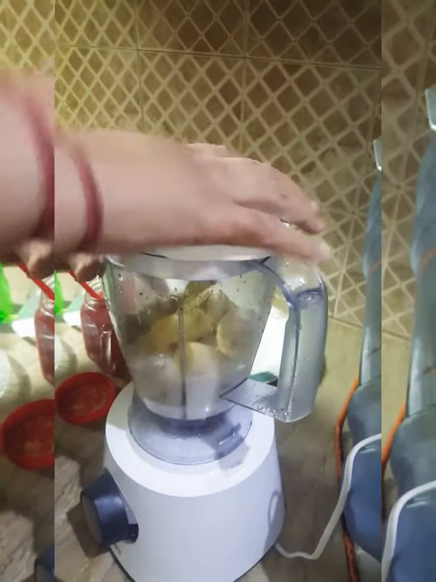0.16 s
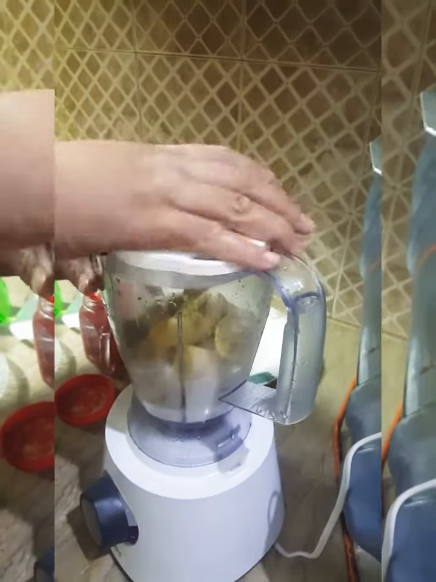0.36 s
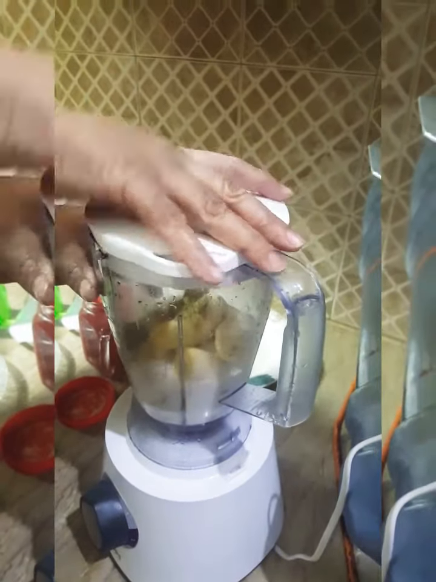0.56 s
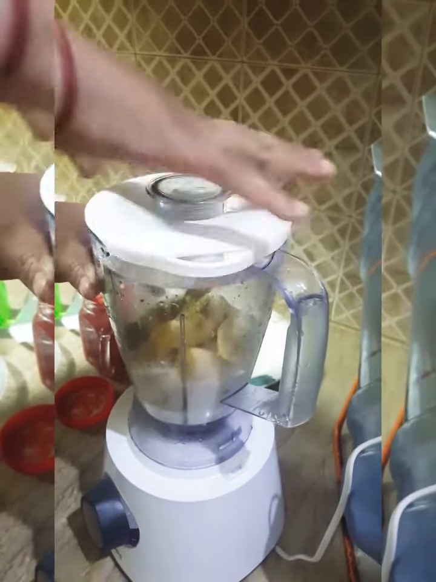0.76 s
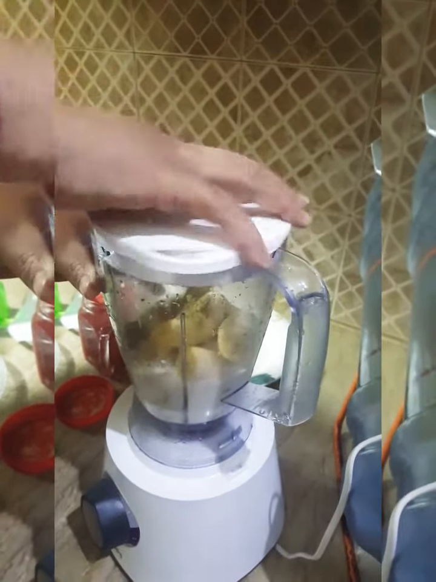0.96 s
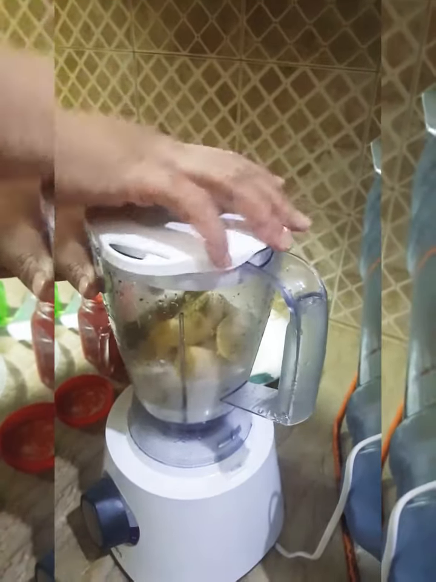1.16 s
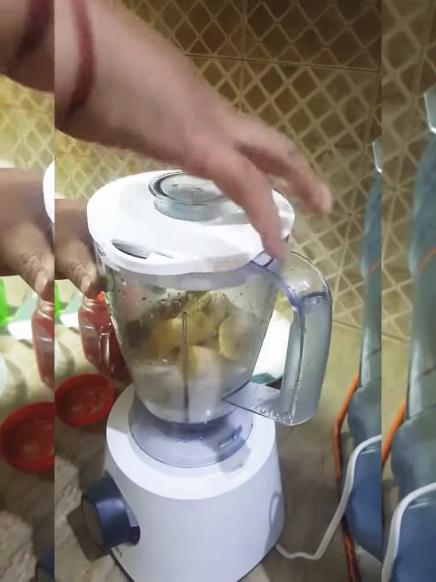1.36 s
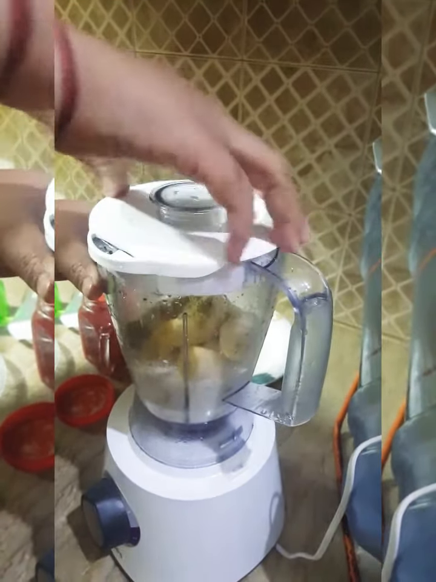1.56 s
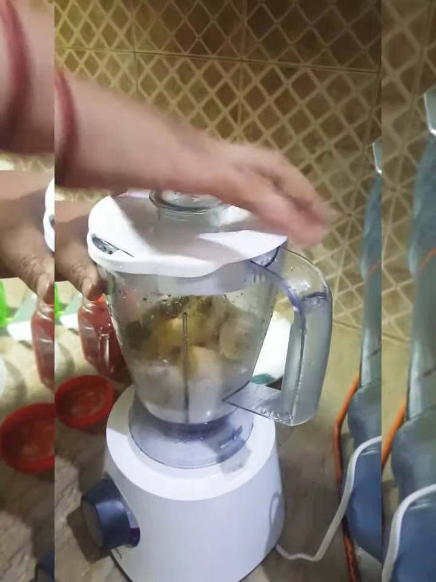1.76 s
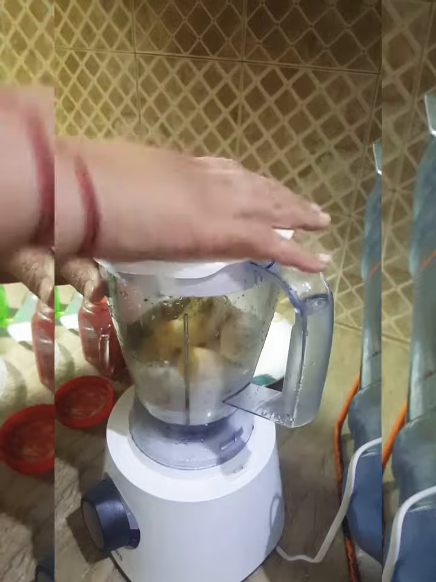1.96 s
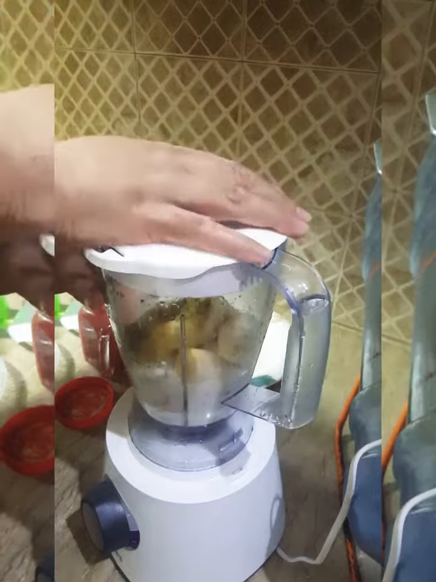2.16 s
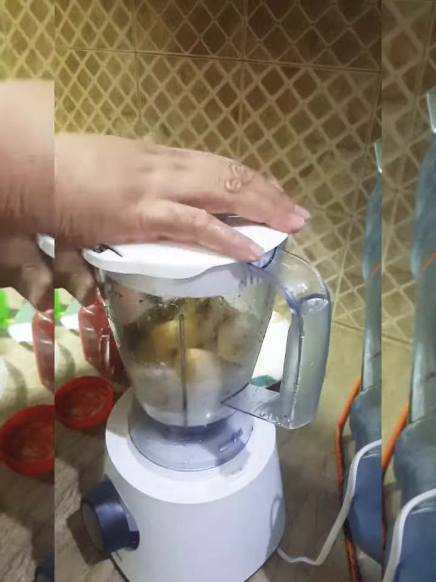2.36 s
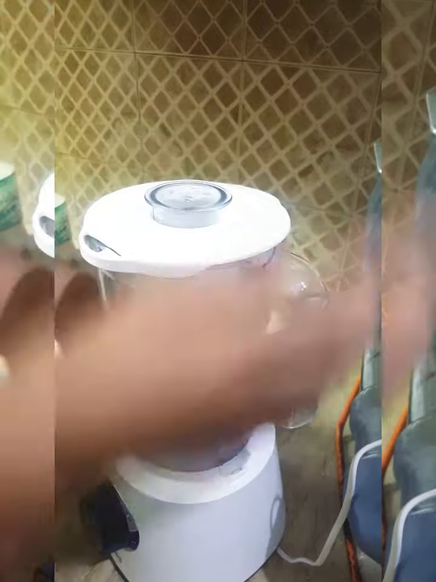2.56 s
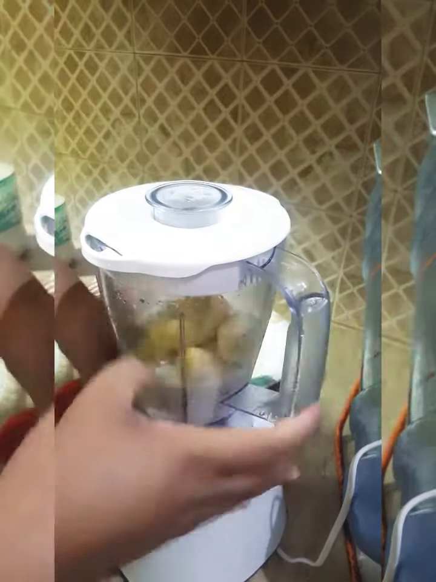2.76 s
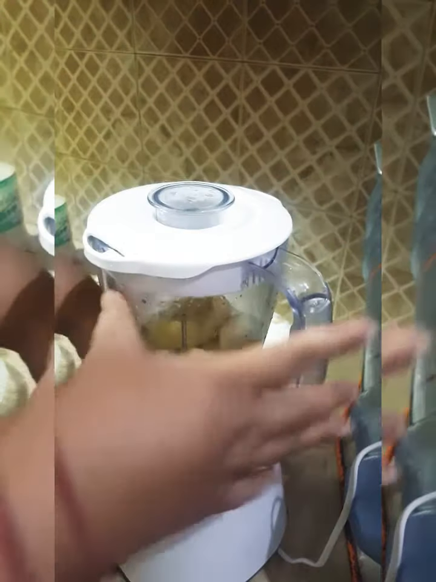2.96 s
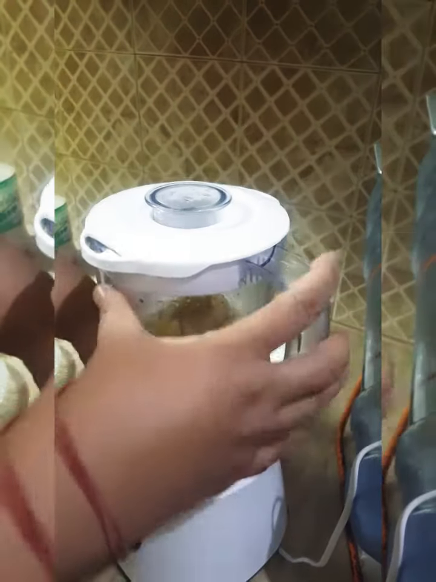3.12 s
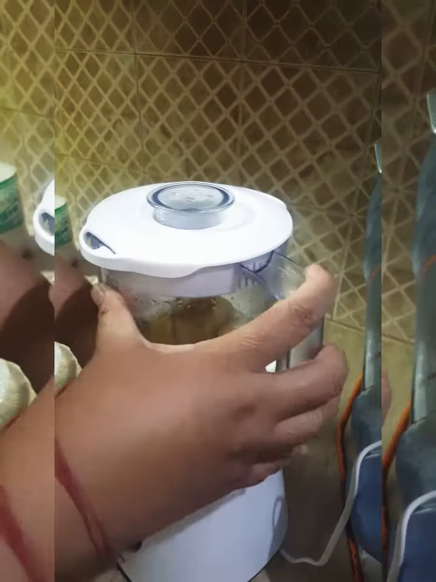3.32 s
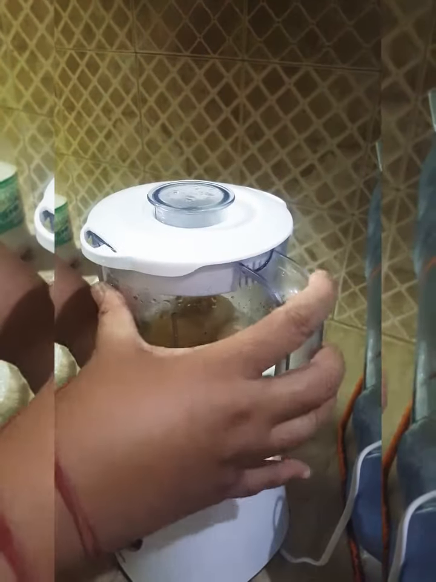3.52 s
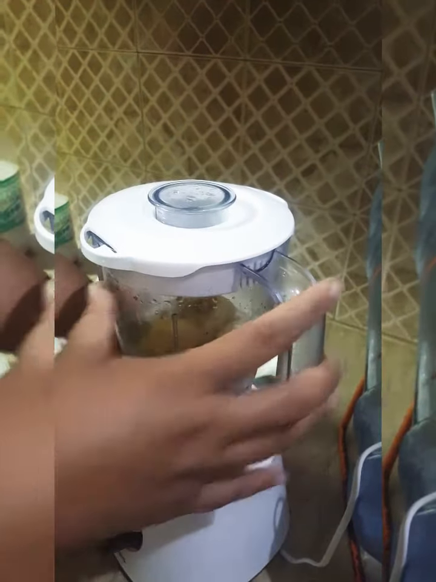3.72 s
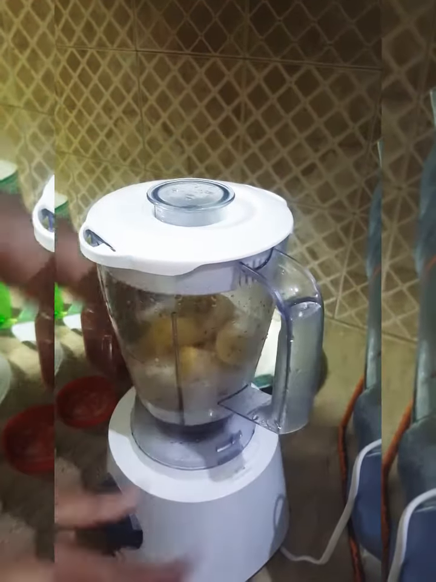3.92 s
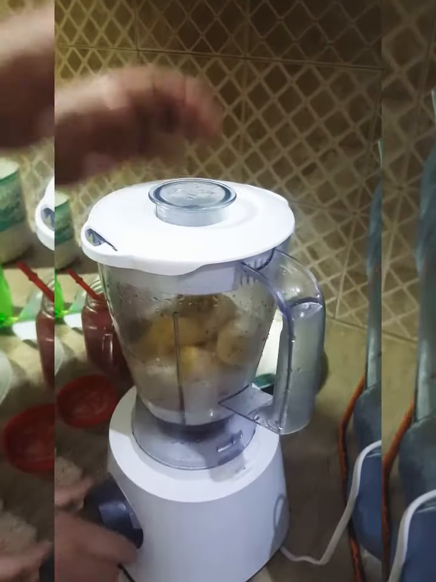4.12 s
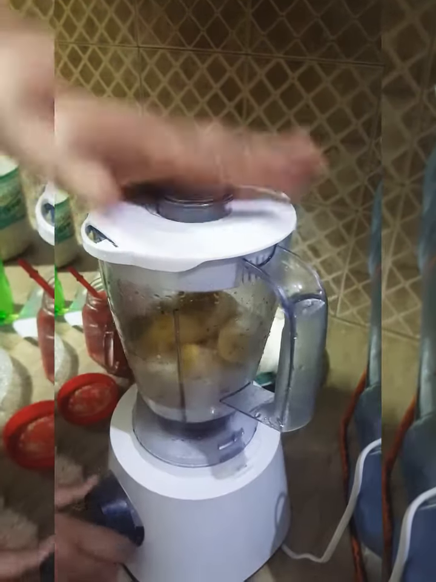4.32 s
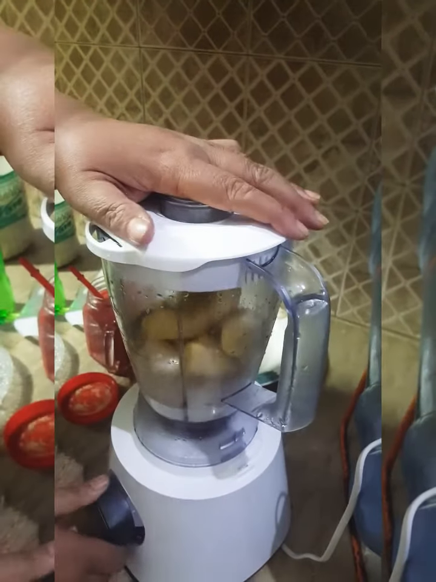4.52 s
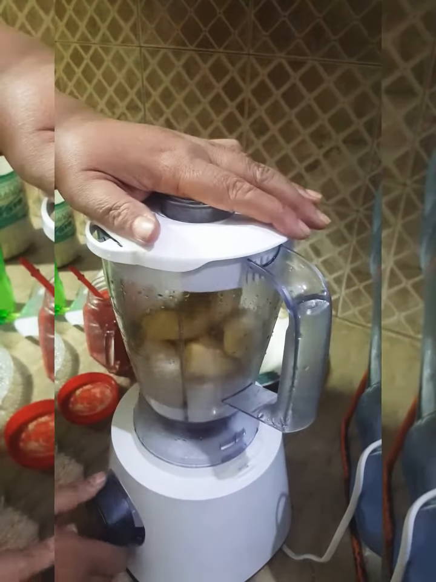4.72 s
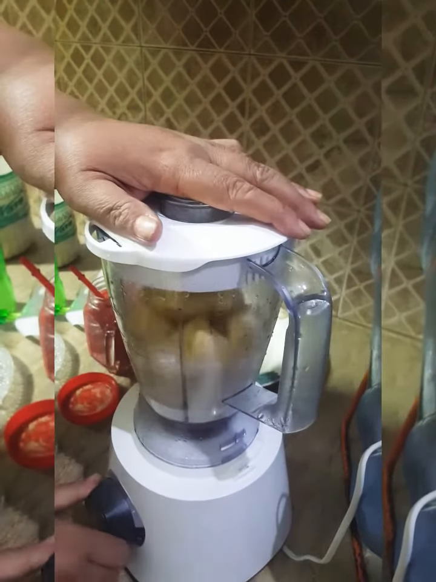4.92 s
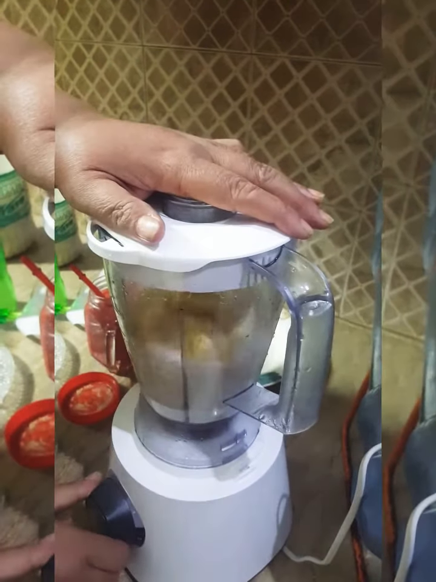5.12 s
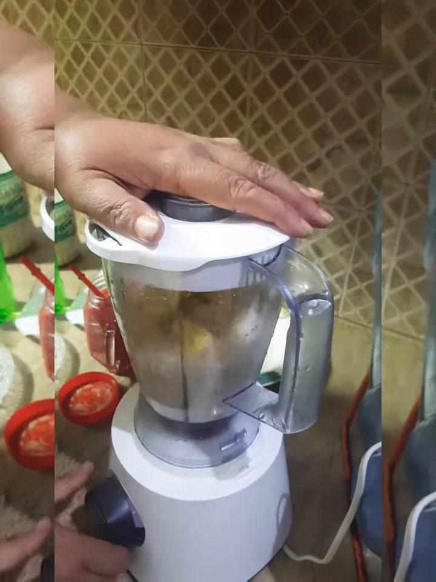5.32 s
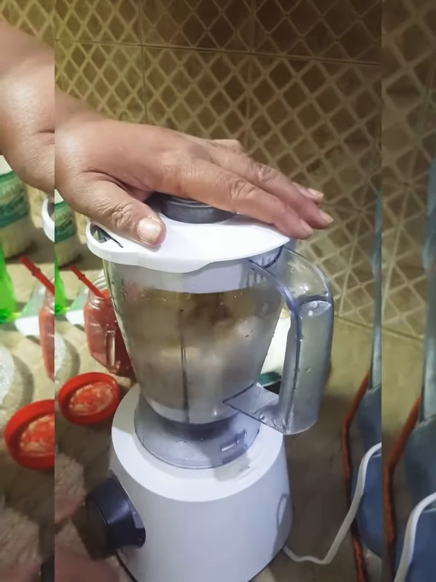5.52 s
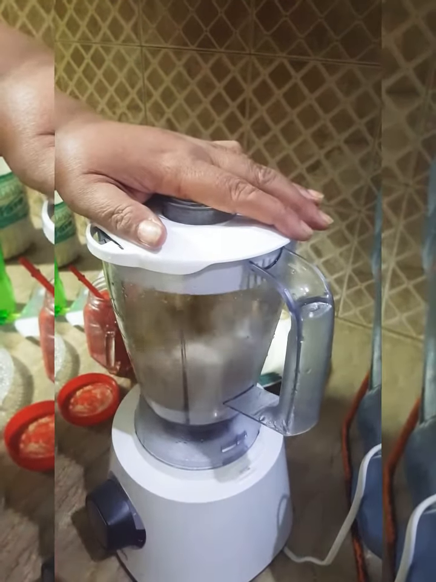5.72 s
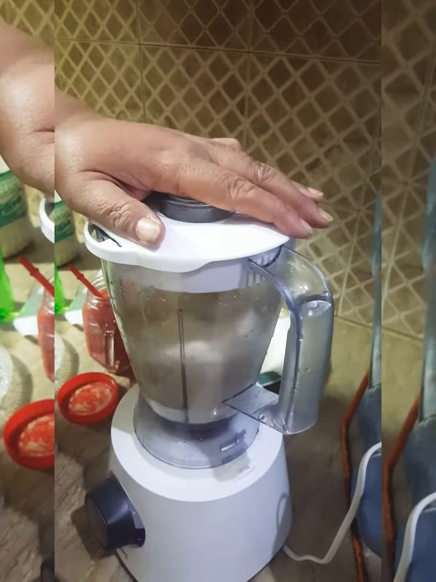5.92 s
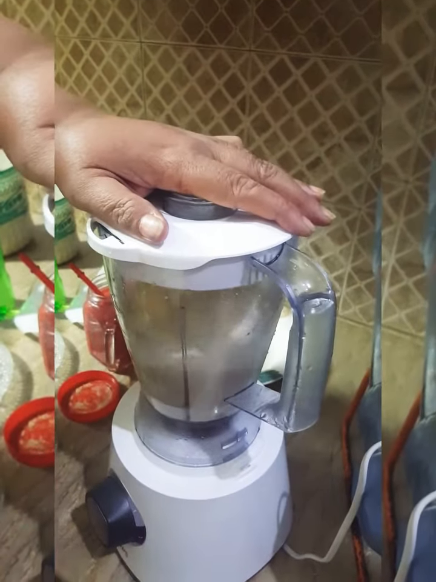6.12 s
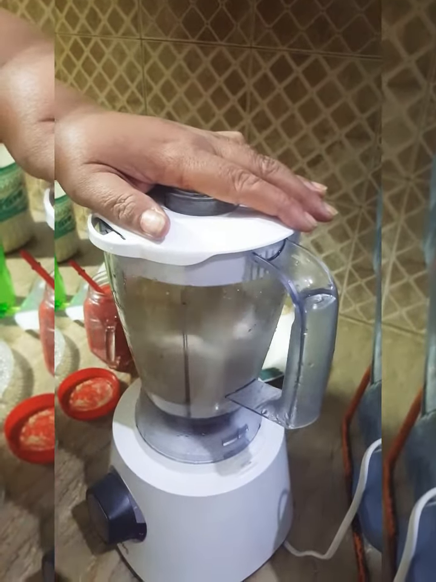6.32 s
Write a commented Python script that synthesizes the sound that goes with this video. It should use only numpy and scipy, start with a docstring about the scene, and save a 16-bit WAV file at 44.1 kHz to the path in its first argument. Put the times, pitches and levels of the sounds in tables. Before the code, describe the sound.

Light plastic lid taps over faint room hum, one hard jar knock, two short motor bursts, then a loud whining blender churning chunks to the end.

```python
"""Over the faint, wavering hum of a small tiled kitchen, a palm presses a plastic lid onto a blender:
each snap makes decaying tones of the lid, a tick and a dull thud, with soft rubbing between.
A hand brushes the jar, which then seats with a knock and one bounce, in noise bursts and ringing tones.
The knob jogs the motor twice and holds it on, still running at the end: random blade impacts batter
chunks against the jar, while the shaft hums and the commutator whines at the same changing speed."""
import sys
import numpy as np
from scipy import signal
from scipy.fft import rfft, irfft
from scipy.io import wavfile
from scipy.ndimage import uniform_filter1d

SR = 44100
rng = np.random.default_rng(int(sys.argv[2]) if len(sys.argv) > 2 else 0)


def master(y):
    """Save y as 16-bit WAV."""
    cut = np.clip(np.atleast_2d(y).T, -1, 1)
    pcm = np.round(cut * 32767)  # scale
    wavfile.write(sys.argv[1], SR, pcm.astype(np.int16))


N = 281358  # length in samples

# Turns of the speed knob: on_s, off_s, level_db (the last one is still on at the end)
KNOB_TURNS = [(4.476, 4.508, 4), (4.784, 4.935, 4), (5.064, 6.4, 0.5)]
# Blender at full speed: time_s, whine_pitch_hz, chopping_db (before CHOP_GAIN_DB)
FULL_SPEED_RUN = [(5.34, 6433, -23), (5.41, 6852, -18), (5.51, 6914, -20), (5.64, 6900, -20.5),
                  (5.87, 6877, -20.5), (5.94, 7080, -22), (6.04, 7470, -20), (6.14, 7320, -21.5),
                  (6.22, 7058, -20), (6.29, 6750, -19.5), (6.38, 6600, -21.5)]
# Chunks crowd into the blades and the noise swells: middle_s, extra_thump_db, extra_chop_db, length_s
JAMS_OF_CHUNKS = [(4.88, 1, 2.5, 0.049), (4.955, 6, -1.5, 0.063), (5.142, 5.5, 2, .05),
                  (5.255, 10, 1.5, 0.045), (5.636, 5, 1.5, .03), (6.355, 8, 1, 0.038)]
# Spectrum of the low thumping: pitch_hz, level_db
THUMP_SPECTRUM = [(70, -21), (110, -5.5), (180, -3), (250, 3.5), (310, -0.5), (350, -7), (405, 2),
                  (470, -12), (700, -64)]
# Spectrum of the chopping: pitch_hz, level_db
CHOP_SPECTRUM = [(330, -34.5), (490, -6.5), (600, -0.5), (1300, 0), (2050, -5), (2500, -10), (3300, -25),
                 (9000, -82)]
# Spectrum of the hissing air and spray: pitch_hz, level_db
HISS_SPECTRUM = [(1800, -10.5), (3000, 2), (4500, -2.5), (6200, -9.5), (7600, -10.5), (9800, -28),
                 (11500, -22), (13800, -19.5), (15500, -33)]
# Resonances of jar and motor housing under the blades: pitch_hz, level_db
CHURN_RESONANCES = [(570, 5.5), (698, 8), (810, -7), (858, 7.5), (1080, 1.5), (1218, 2.5), (1432, 5),
                    (1591, 7), (1702, 2), (1892, 3), (1985, 8), (2075, 1.5), (2165, 0)]
# Harmonics of the shaft hum: multiple_of_shaft_speed, level_db
HUM_HARMONICS = [(1, 0), (2, -5), (3, -10.5), (4, -6), (6, -1.5), (8, -5.5), (9, 1.5), (10, -10)]
# Whine of the 24 commutator bars: multiples of the shaft speed
WHINE_MULTIPLES = (48, 72, 96)
# Housing that radiates the whine: pitch_hz, level_db
HOUSING_SPECTRUM = [(5000, -22), (6400, -7), (6950, 0), (7600, -4.5), (9600, -22), (11200, -13),
                    (12400, -13), (13600, -9), (15500, -24)]
# Blades catching big chunks: start_s, level_db, strongest_ring_hz
BIG_CHUNK_HITS = [(4.472, -28.5, 1030), (4.486, -24, 1740), (5.214, -23, 1189), (5.403, -21, 1180),
                  (5.474, -16.5, 2000), (5.504, -14, 1980), (5.755, -21, 804), (5.777, -19, 1220),
                  (5.821, -16.5, 1240), (6.139, -15.5, 1705), (6.205, -19.5, 830), (6.256, -28, 1320)]
# Jar knocking on the base and bouncing once: start_s, crack_db, ring_db
SEATING_KNOCKS = [(3.3876, -12, -12.5), (3.3987, -23.5, -26)]
# Crack of the jar: pitch_hz, level_db
CRACK_SPECTRUM = [(60, -40), (140, 0), (240, 3), (370, -4), (560, -1), (770, 0), (1050, -11), (1500, -13),
                  (1950, -1), (3100, -6), (3800, -15), (4600, -12.5), (5600, -26), (10000, -38),
                  (14000, -41)]
# Empty upper wall of the jar: pitch_hz, level_db, t60_s (time to fall by 60 dB)
JAR_WALL_MODES = [(158, -0.5, .44), (226, 6.5, 0.186), (284, 5, 0.15), (386, 1.5, 0.32), (605, 11, 0.17),
                  (690, 13.5, 0.089), (849, 3, 0.15), (1150, 4, .1), (1322, -4, 0.27), (1846, 15, 0.036),
                  (2013, 2, 0.06), (2140, 1, 0.1), (2450, -10, .14), (2767, 14, 0.061), (3330, -5, 0.088),
                  (4200, -6, 0.092)]
# Lid snapping into place; last row, a hand brushing the jar:
# start_s, ring_db, strongest_ring_hz, thud_db, tick_db (before the shared gains)
SNAPS_AND_BRUSH = [(0.35, -25, 795, -32, -43), (0.366, -28, 824, -34, -55),
                   (0.512, -21.5, 1600, -35.5, -54), (0.6459, -27.5, 1920, -34, -40),
                   (0.773, -23.5, 1310, -34.5, -34.5), (0.889, -22.5, 1470, -31, -35),
                   (0.974, -33.5, 703, -34.5, -45.5), (1.108, -17.5, 1300, -31, -38),
                   (1.165, -33, 1260, -35.5, -46.5), (1.507, -25, 1130, -39.5, -45.5),
                   (1.5603, -29.5, 1260, -33.5, -52), (1.626, -28.5, 1330, -33, -40),
                   (2.0885, -20.5, 700, -44, -42), (2.906, -42, 2190, -53, -44)]
# Ringing of the lid: pitch_hz, level_db, t60_s
LID_RING_MODES = [(551, 5, 0.021), (805, 1, 0.037), (1090, 0, 0.018), (1310, 5.5, 0.018), (1664, 7, 0.0078),
                  (1926, 4.5, 0.016), (2190, 5.5, 0.014), (3040, 3, 0.012), (4450, 9.5, 0.011)]
# Tick at the rim: pitch_hz, level_db
TICK_SPECTRUM = [(500, 0.5), (1500, 4), (3300, 9.5), (5500, -7), (8500, -16.5), (10500, -29), (14500, -38)]
# Thud of the air in the jar: pitch_hz, level_db
THUD_SPECTRUM = [(50, -22), (150, 7.5), (210, -0.5), (300, 1), (420, -9), (800, -16.5), (2000, -47)]
# Blender rocking under the palm: start_s, level_db, pitch_hz
ROCKING_BUMPS = [(0.875, -39, 135), (1.606, -34.5, 240), (1.622, -32, 96)]
# Palm sliding on the plastic: fastest_s, level_db, length_s
PALM_SLIDES = [(0.297, -51, 0.35), (0.513, -43.5, 0.044), (0.771, -45, 0.06), (1.02, -47.5, 0.21),
               (1.59, -43, 0.13), (1.79, -48, 0.019), (2.09, -50.5, 0.13), (2.909, -42.5, 0.035)]
# Palm rubbing: pitch_hz, level_db
RUB_SPECTRUM = [(500, 8.5), (2000, 10.5), (4500, 1.5), (8300, -5), (10500, -13.5), (15000, -14)]
# Catches of lid, jar and knob: start_s, level_db, scrape_length_s, top_treble_db
PLASTIC_CATCHES = [(.351, -36.5, 0.012, -10), (1.01, -47, .008, -19), (1.573, -41.5, .005, -19),
                   (2.899, -45, 0.0028, -12), (3.354, -49, .005, -15), (4.421, -44.5, 0.0029, -20),
                   (4.47, -33, 0.02, -7)]
# Catches below the top treble: pitch_hz, level_db
CATCH_SPECTRUM = [(60, -27), (300, 4), (1100, 6), (3400, 7), (6500, -2.5), (8500, -3)]
# Soft noise of the kitchen: pitch_hz, level_db
KITCHEN_SPECTRUM = [(25, -18.5), (65, -12), (88, -4.5), (120, -1), (170, -10.5), (290, -9), (370, -12),
                    (500, -12), (660, -18), (1500, -25.5), (2600, -26), (3500, -35.5), (5500, -42),
                    (8500, -47.5), (10000, -54), (15000, -47.5)]
# Steady tones of the kitchen hum: pitch_hz, level_db (they waver, and gain 3 dB in the mix)
HUMMING_TONES = [(99, -49), (123.5, -55.5), (297, -57.5), (395, -51.5), (494.5, -52.5)]
# Stereo width of a sound from all around: pitch_hz, side_minus_mid_db
STEREO_WIDTH = [(60, -10), (170, -17.5), (380, -7), (700, -2.5), (1400, 0), (5000, -0.5)]
# Difference between the microphones: pitch_hz, left_minus_right_db
MICROPHONE_LEAN = [(100, 1), (200, 3), (380, -1.5), (700, 2), (1300, 5), (2400, 2.5), (4400, -1),
                   (8100, 5.5), (14000, -1.5)]

# The rotor lags behind the knob; the motor pulls this much harder than the load lets it run
INERTIA_S, PULL = 0.25, 1.25
# Dying away (t60) if switched off at full speed: chopping, then big chunks, which tumble on longer
RUN_DOWN_S, TUMBLE_S = 0.63, 1
# Each noise: gain or level at full speed, and how much it gains from standstill to there
CHOP_GAIN_DB, CHOP_RISE_DB = 0.77, 9.5
THUMP_DB, THUMP_RISE_DB = -28.5, 6
HISS_DB, HISS_RISE_DB = -34, 10
# Hum of the shaft (before a 3 dB gain), and the lowest jar resonance, which it wakes near top speed
HUM_DB, BOOM_DB, BOOM_HZ, BOOM_WIDTH_HZ = -34, 10, 156.7, 6.7
# Echoes from the nearest tiles: longest delay, and their share of the sound from the sides
SCATTER_S, SCATTER_SHARE = 0.008, 0.7
# Shared by every lid snap: gains of its parts, scrape of the tick, and the rim letting go almost at once
RING_GAIN_DB, THUD_GAIN_DB, TICK_GAIN_DB, SCRAPE_S, SNAP_S = -11, 1.5, 4, 0.0054, 0.002
BUMP_T60_S = 0.11
TOP_HZ = 15900  # hardly anything is heard above this pitch


def amp(db):
    """Turn decibels into a gain."""
    return 10 ** (np.asarray(db) / 20)


def unit(x):
    """Scale to an average power of 1 (rms 1)."""
    return x / np.sqrt(np.mean(x ** 2) + 1e-18)


def curve(rows, column=1):
    """Give a control value at every sample, in straight lines between the rows."""
    rows = np.array(rows)
    return np.interp(np.arange(N) / SR, rows[:, 0], rows[:, column])


def spectrum_at(points, size):
    """Read a pitch_hz, level_db table at every frequency step of a transform."""
    hz, db = np.transpose(points)
    steps_hz = np.arange(size // 2 + 1) * SR / size
    return np.interp(np.log(steps_hz + 1), np.log(hz), db)


def colour(x, points):
    """Filter to a given spectrum without ringing ahead of the sound, by folding the cepstrum."""
    size = 4096
    cepstrum = irfft(np.log(amp(spectrum_at(points, size))))
    cepstrum[1:size // 2] *= 2
    cepstrum[size // 2 + 1:] = 0
    response = irfft(np.exp(rfft(cepstrum)))[:size // 2]
    return ring(x, response)


def ring(x, response):
    """Let a force set off a body's response at every instant (convolution)."""
    return signal.fftconvolve(x, response)[:len(x)]


def fade(t60):
    """Half a second of decay that falls by 60 dB every t60 seconds."""
    return np.exp(-np.log(1000) * np.arange(SR // 2) / SR / t60)


def modes(table):
    """A struck body rings as a sum of decaying sines, here with alternating signs."""
    t = np.arange(SR // 2) / SR
    total = 0
    for k, (hz, db, t60) in enumerate(table):
        total = total + (-1) ** k * amp(db) * fade(t60) * np.sin(2 * np.pi * hz * t)
    return total


def resonance(x, hz, width_hz):
    """One ringing pitch of a body that is driven without pause."""
    return signal.lfilter(*signal.iirpeak(hz, hz / width_hz, fs=SR), x)


def walk(rate):
    """Smooth random drift of rms 1, with about this many new values per second."""
    k = max(int(SR / rate), 1)
    held = np.repeat(rng.standard_normal(N // k + 1), k)
    return unit(uniform_filter1d(held, k)[:N])


def add(track, s, sound):
    """Mix a sound in at a time in seconds."""
    start = int(s * SR)
    track[start:start + len(sound)] += sound[:N - start]


def blow(sound, db):
    """Give a short sound the energy of 10 ms at this level."""
    return sound * amp(db) * np.sqrt(SR / 100 / np.sum(sound ** 2))


def contact(length):
    """Two surfaces touch: a sharp tick, then a short scrape of fading noise."""
    scrape = rng.standard_normal(SR // 2) * fade(3 * length)
    scrape[0] = 7.5
    return scrape


def snap(length, hz, focus_db):
    """Contact rings the lid modes, weaker by focus_db per octave away from one favoured pitch."""
    favoured = []
    for mode_hz, db, t60 in LID_RING_MODES:
        octaves = np.abs(np.log2(mode_hz / hz))
        favoured.append((mode_hz, db - focus_db * octaves, t60))
    return ring(contact(length), modes(favoured))


def diffuse(mid, side):
    """Spread two signals into stereo, alike in the bass and wide in the treble."""
    side = colour(side, STEREO_WIDTH)
    return np.array([mid + side, mid - side])


def room(x, wet_db, t60=0.26, treble_t60=0.1):
    """Direct sound, a little earlier on the left, plus the dense echo of tiled walls."""
    split = signal.butter(1, 2500, fs=SR)
    echoes = []
    for noise in rng.standard_normal((2, SR // 2)):
        low = signal.lfilter(*split, noise)
        tail = low * fade(t60) + (noise - low) * fade(treble_t60)
        tail = tail * (1 - fade(0.0017))  # the echo builds up quickly
        echoes.append(ring(x, tail / np.sqrt(np.sum(tail ** 2))))
    direct = np.array([x, np.roll(x, 6)])  # delay in samples
    return direct + amp(wet_db) * diffuse(*echoes)


def scatter(x):
    """Nearby tiles throw a sound back, each pitch by a path of its own length."""
    hz = np.arange(N // 2 + 1) * SR / N
    delay = np.interp(hz, np.linspace(0, SR / 2, 120), SCATTER_S * rng.random(120))
    phase = 2 * np.pi * np.cumsum(delay) * SR / N  # delay summed over pitch gives phase
    return irfft(rfft(x) * np.exp(-1j * phase), N)


def spin_up():
    """Share of full speed: the rotor gathers pace while the knob is on and coasts while it is off."""
    t = np.arange(N) / SR
    power = np.zeros(N)
    for on, off, _ in KNOB_TURNS:
        power += (t >= on) & (t < off)
    keep = np.exp(-1 / (INERTIA_S * SR))
    pace = signal.lfilter([1 - keep], [1, -keep], power)
    return np.minimum(PULL * pace, 1)


def drive(spin, t60):
    """Each knob turn starts at once and holds; once off, it dies away slower the faster the blades ran."""
    t = np.arange(N) / SR
    out = np.zeros(N)
    for on, off, db in KNOB_TURNS:
        release = t60 * np.sqrt(np.interp(off, t, spin))
        out += (t >= on) * amp(db) * np.exp(-np.log(1000) * np.maximum(t - off, 0) / release)
    return out


def strikes(turns, per_second, spread_db):
    """Random impacts of uneven size, crowding once a turn, where the lowest blade digs in."""
    chance = per_second / SR * (1 + 0.8 * np.cos(2 * np.pi * turns))
    sizes = amp(spread_db * np.minimum(rng.exponential(size=N), 4))
    signs = rng.choice([-1, 1], N)
    return unit((rng.random(N) < chance) * sizes * signs)


def churn(turns):
    """One draw of the blade noises, each of rms 1: chopping on the jar wall, low thuds and hissing spray."""
    pulp = strikes(turns, per_second=3000, spread_db=0)
    chunks = strikes(turns, per_second=600, spread_db=0.8)
    # wet pieces land softly
    soft = signal.sosfilt(signal.butter(2, 3200, fs=SR, output="sos"), chunks)
    rattle = 0
    for hz, db in CHURN_RESONANCES:
        tumble_db = 3 * walk(14)  # tumbling pieces favour now one resonance, now another
        rattle = rattle + amp(db + tumble_db) * resonance(soft, hz, width_hz=11.7)
    cuts = unit(colour(pulp + amp(-4) * chunks, CHOP_SPECTRUM))
    wall = unit(cuts + amp(-4.5) * unit(rattle))
    thuds = unit(colour(strikes(turns, per_second=1800, spread_db=2), THUMP_SPECTRUM))
    spray = unit(colour(pulp + rng.standard_normal(N), HISS_SPECTRUM))
    return wall, thuds, spray


def chopping(spin, turns):
    """Blades hit chunks and pulp; larger pieces rattle on the jar wall; air and spray hiss."""
    t = np.arange(N) / SR
    cutting = drive(spin, RUN_DOWN_S)
    slack = 1 - spin
    chop_db = curve(FULL_SPEED_RUN, column=2) + CHOP_GAIN_DB - CHOP_RISE_DB * slack
    chop = cutting * amp(chop_db)
    thump = drive(spin, TUMBLE_S) * amp(THUMP_DB - THUMP_RISE_DB * slack)
    hiss = cutting * amp(HISS_DB - HISS_RISE_DB * slack)
    for s, extra_thump_db, extra_chop_db, length in JAMS_OF_CHUNKS:
        swell = np.exp(-((t - s) / length) ** 2)
        thump = thump * amp(extra_thump_db * swell)
        chop = chop * amp(extra_chop_db * swell)
        hiss = hiss * amp(extra_chop_db * swell)
    surge = amp(1.1 * walk(60))  # the load comes in lumps
    field = []
    for _ in range(2):
        wall, thuds, spray = churn(turns)
        field.append(chop * surge * wall + thump * thuds + hiss * spray)
    direct, far = field
    side = SCATTER_SHARE * scatter(direct) + np.sqrt(1 - SCATTER_SHARE ** 2) * far
    return diffuse(direct, side)


def motor(spin, turns):
    """The unbalanced shaft hums and booms the jar; brushes whine on the commutator with varying grip."""
    hum = 0
    for k, db in HUM_HARMONICS:
        wobble_db = 2 * walk(22)
        hum = hum + amp(db + wobble_db) * np.sin(2 * np.pi * k * turns)
    hum = hum + amp(BOOM_DB) * resonance(hum, BOOM_HZ, width_hz=BOOM_WIDTH_HZ)
    grip = amp(2.2 * walk(30))
    whine = []
    for _ in range(2):
        brushes = 0
        for k in WHINE_MULTIPLES:
            # brush chatter smears each tone into a narrow band, wider for the higher ones
            chatter = k / WHINE_MULTIPLES[0] * walk(300)
            brushes = brushes + walk(k * k / 6) * np.sin(2 * np.pi * k * turns + chatter)
        whine.append(amp(-36) * grip * colour(brushes, HOUSING_SPECTRUM))
    strength = drive(spin, RUN_DOWN_S) * spin ** 2
    return strength * (np.sqrt(2) * amp(HUM_DB) * spin * hum + np.array(whine))


def jar():
    """The jar drops into its seat with a crack and a ring; later, hard chunks knock on its plastic."""
    knocks, ringing = np.zeros((2, N))
    for s, crack_db, ring_db in SEATING_KNOCKS:
        add(knocks, s, blow(colour(contact(0.0095), CRACK_SPECTRUM), crack_db))
        add(ringing, s, blow(modes(JAR_WALL_MODES), ring_db))
    for s, db, hz in BIG_CHUNK_HITS:
        # the chunks borrow the plastic ring of the lid
        add(knocks, s, blow(snap(0.033, hz, focus_db=18.5), db))
    knocks_in_room = room(knocks, wet_db=-4, t60=0.25, treble_t60=0.22)
    return knocks_in_room + room(ringing, wet_db=-13, t60=0.25, treble_t60=0.22)


def lid_and_hand():
    """Snaps ring the lid, tick at the rim and thud in the jar's air; the hand rocks, rubs and brushes."""
    t = np.arange(N) / SR
    out = np.zeros(N)
    # the brush on the jar is made of the same three parts as a snap
    for s, ring_db, hz, thud_db, tick_db in SNAPS_AND_BRUSH:
        tick = colour(contact(SCRAPE_S), TICK_SPECTRUM)
        thud = colour(contact(0.026), THUD_SPECTRUM)
        add(out, s, blow(snap(SNAP_S, hz, focus_db=13), ring_db + RING_GAIN_DB))
        add(out, s, blow(tick, tick_db + TICK_GAIN_DB))
        add(out, s, blow(thud, thud_db + THUD_GAIN_DB))
    for s, db, hz in ROCKING_BUMPS:
        add(out, s, blow(modes([(hz, 0, BUMP_T60_S)]), db))
    rubbing = 0
    for s, db, length in PALM_SLIDES:
        # 20 dB softer for every length away from the fastest moment
        rubbing = rubbing + amp(db - 20 * np.abs(t - s) / length)
    slips = rng.standard_normal(N) * amp(2 * walk(160))
    out += rubbing * unit(colour(slips, RUB_SPECTRUM))
    return room(out, wet_db=-7.5, t60=0.22)


def catches():
    """Thin plastic catches snap, short and bright: a tick and scrape coloured by the plastic."""
    out = np.zeros(N)
    for s, db, length, top_db in PLASTIC_CATCHES:
        spectrum = CATCH_SPECTRUM + [(11000, top_db), (15000, top_db)]
        add(out, s, blow(colour(contact(length), spectrum), db))
    return room(out, wet_db=2.5)


def kitchen():
    """Soft room noise from all around, and a hum of steady tones wavering in level and phase."""
    t = np.arange(N) / SR
    mid, side = [unit(colour(rng.standard_normal(N), KITCHEN_SPECTRUM)) for _ in range(2)]
    hum = 0
    for hz, db in HUMMING_TONES:
        level = amp(db + 1.1 * walk(8))
        hum = hum + level * np.sin(2 * np.pi * hz * t + 0.7 * walk(9))
    return amp(-46.5) * diffuse(mid, side) + np.sqrt(2) * hum


def scene():
    """Running blender, jar, lid and catches in the kitchen; one shaft speed serves blades and motor."""
    spin = spin_up()
    full_speed = curve(FULL_SPEED_RUN) / WHINE_MULTIPLES[0]  # shaft turns per second
    speed = spin * full_speed * (1 + 0.004 * walk(35))  # the speed wavers a little
    turns = np.cumsum(speed) / SR
    blender = chopping(spin, turns) + motor(spin, turns)
    return blender + jar() + lid_and_hand() + catches() + kitchen()


def record(dry):
    """The two microphones differ in colour; loud peaks are rounded and the top is cut steeply."""
    lean_db = spectrum_at(MICROPHONE_LEAN, N) * np.array([[0.5], [-0.5]])
    heard = irfft(rfft(dry) * amp(lean_db), N)
    heard = heard / (1 + (heard / 0.85) ** 4) ** 0.25
    return signal.sosfilt(signal.ellip(10, 0.2, 80, TOP_HZ, fs=SR, output="sos"), heard)


dry = scene()
out = record(dry)
master(out)
```